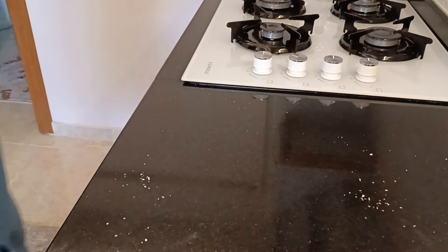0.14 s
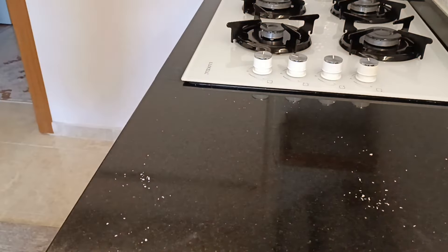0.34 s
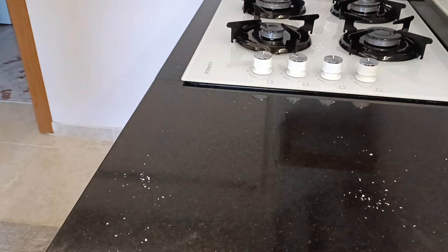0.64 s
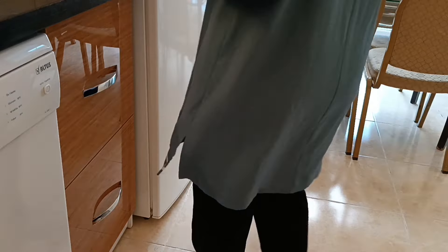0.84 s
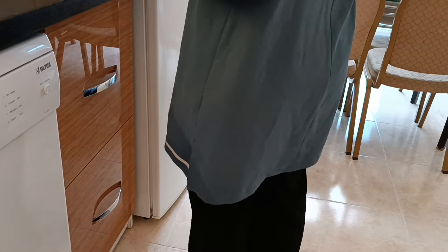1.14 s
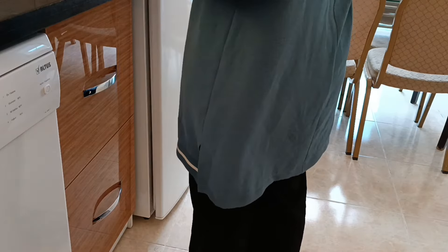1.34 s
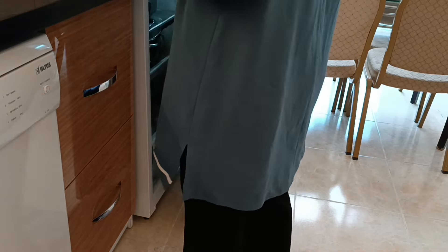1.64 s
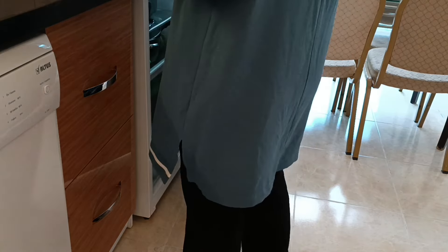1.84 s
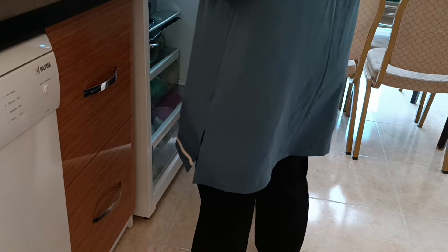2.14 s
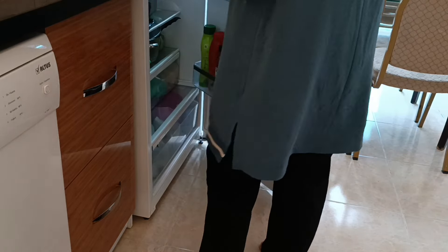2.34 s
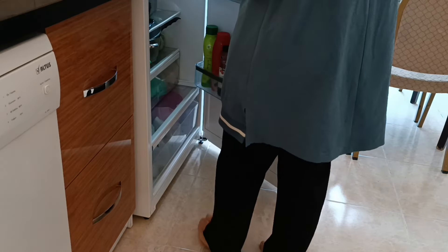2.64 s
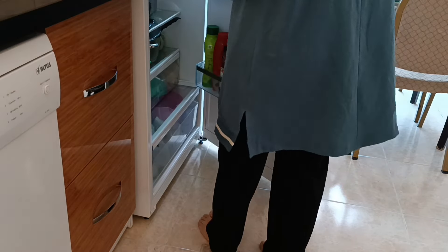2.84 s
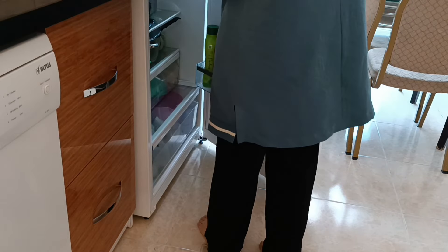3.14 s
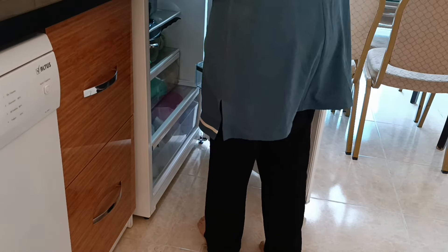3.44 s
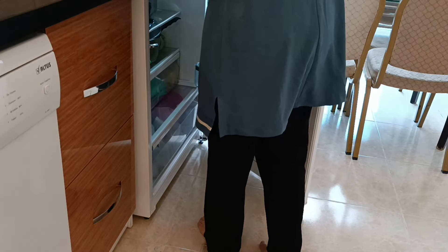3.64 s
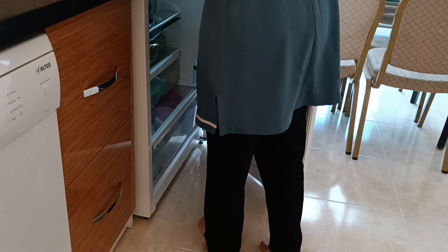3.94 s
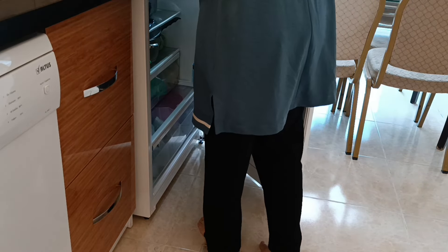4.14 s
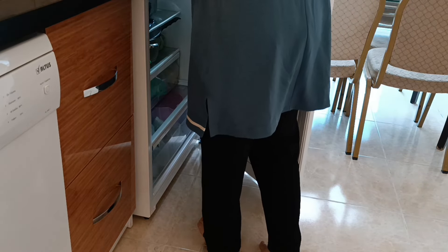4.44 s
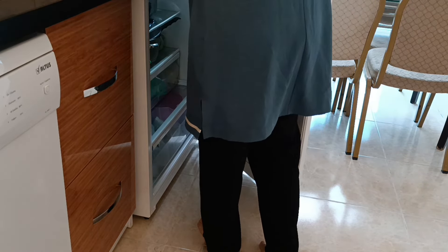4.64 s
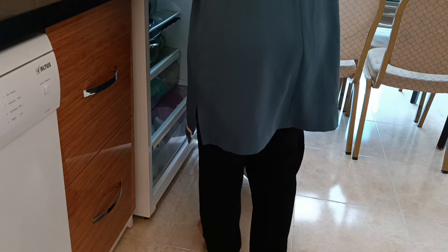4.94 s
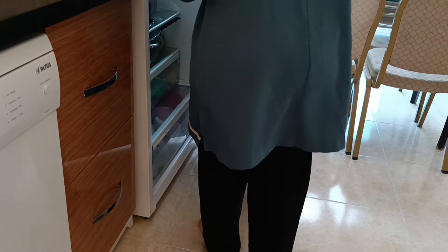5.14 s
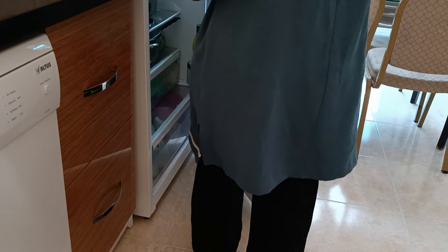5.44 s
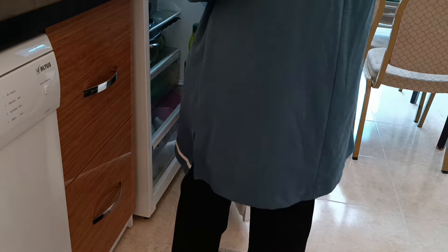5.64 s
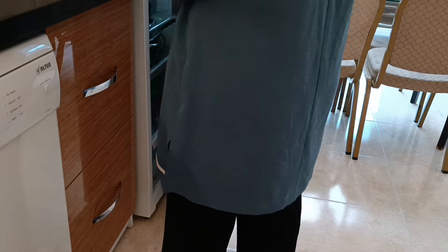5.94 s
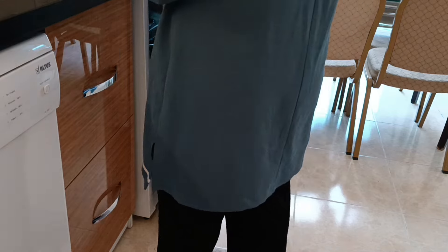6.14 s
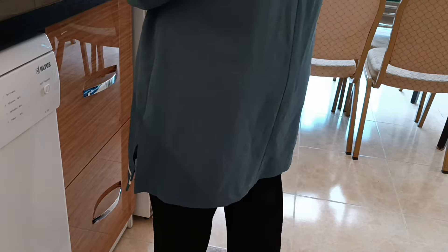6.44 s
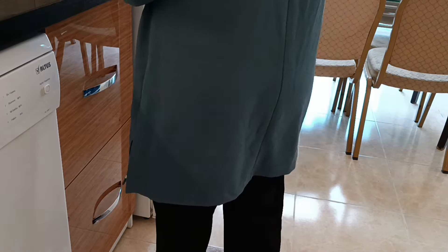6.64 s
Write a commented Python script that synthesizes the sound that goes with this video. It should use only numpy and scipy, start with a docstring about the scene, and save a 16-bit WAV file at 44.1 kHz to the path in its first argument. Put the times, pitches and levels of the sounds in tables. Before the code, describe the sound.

In a tiled kitchen, cloth rustles, a fridge opens, a heavy dish bangs and judders along a shelf, bumps home, and the door closes.

```python
"""A tiled kitchen, two metres from a refrigerator: clothes rustle over still air and the opening has a faint hum.
The gasket crackles as it peels off, and plastic bottles knock hollowly in the door rack.
A heavy glass dish is set on a shelf, scrapes in with a judder and bumps home; then the door swings shut.
Bursts of tiny rebounds drive resonances for the knocks, random slips make the scrape, shaped noise makes
the cloth, and low sines make booms and hums; a dense stereo echo places the nearer sounds in the room."""
import sys
import numpy as np
from scipy import signal
from scipy.fft import rfft, irfft
from scipy.io import wavfile
from scipy.ndimage import uniform_filter1d

SR = 44100
rng = np.random.default_rng(int(sys.argv[2]) if len(sys.argv) > 2 else 0)


def bounce(signal):
    """Save signal as a 16-bit WAV file at the path given by the first command-line argument."""
    frames = np.transpose(np.atleast_2d(signal))
    limited = np.clip(frames, -1, 1)
    pcm = np.round(limited * 32767).astype(np.int16)
    wavfile.write(sys.argv[1], SR, pcm)


N = 298998
TIME = np.arange(N) / SR   # seconds
FILTER_HZ = np.linspace(0, SR / 2, 4097)   # pitches at which filter gains are given

# Spectrum of the still room air, relative: pitch_hz, level_db (per Hz)
AIR_SPECTRUM = [(15, -49), (25, -15), (77, -2), (110, -4), (215, -5), (378, -13), (582, -14.5), (945, -17),
                (1300, -19.5), (1410, -18.5), (2230, -20.5), (6210, -34.5), (8580, -40.5), (15500, -38)]
AIR_LEVEL_DB = -59
# Faint hums, level before wavering: start_s, end_s, pitch_hz, level_db, fade_out_s
HUMS = [(0, .867, 118, -58.5, .08), (0, 0.98, 176, -65.5, .08), (.87, 1.78, 352.6, -59, .45)]

# Echo of the kitchen: pitch_hz, t60_s, echo_over_direct_db, left_right_likeness (0 to 1)
ROOM = [(60, 0.36, 4, 0.71), (138.3, 0.61, -7, 0.78), (277, 0.52, 7, 0.9), (595, 0.46, 18, .5),
        (1313, .53, 10, 0.057), (2900, 0.38, 10.5, 0.012), (6100, 0.35, 10, 0.018), (13800, 0.23, 15.5, 0)]
# Balance of the two channels: pitch_hz, left_over_right_db
STEREO_BALANCE = [(100, 0.5), (400, -2.5), (2400, -1), (7000, -4.5), (10000, 0.5), (13000, 11)]

# Colour of the rustling cloth, relative: pitch_hz, level_db
CLOTH_COLOUR = [(100, -18), (300, -5.5), (900, 0.5), (2000, 4), (3500, -7), (7000, -21), (14000, -34.5)]
# Broad swishes of cloth: middle_s, level_db, half_length_s, brightness_db_per_octave
CLOTH_SWISHES = [(.01, -53.5, 0.015, 1.5), (0.179, -56, 0.094, 5.5), (0.549, -46, 0.076, 0),
                 (0.935, -46, 0.021, 1.5), (0.986, -51, .04, -9), (5.304, -65.5, 0.23, 8),
                 (5.78, -63.5, 0.032, 5.5)]
# Narrow squeaks of rubbed cloth and rubber: middle_s, level_db, half_length_s, pitch_hz
SQUEAKS = [(.28, -56, .2, 3077), (0.415, -57, .14, 1810), (1.335, -38, .018, 2150)]
SQUEAK_OCTAVES = 0.34   # width of a squeak's band

# Jolts of the cabinet (door opens, dish bumps home, door shuts): start_s, boom_db, drone_db, drone_hz
CABINET_JOLTS = [(1.473, -23, -48, 103), (4.635, -26, -26.5, 145.8), (6.404, -30.5, -39.5, 143.4)]
BOOM_HZ, BOOM_T60_S, BOOM_LENGTH_S = 86, 0.17, 0.11
DRONE_DELAY_S, DRONE_T60_S, DRONE_LENGTH_S = 0.1, 0.69, 0.26

HARDNESS_PIVOT_HZ = 684   # hardness and cloth brightness tilt a spectrum about this pitch

# Bottles knocking, level before RACK_GAIN_DB: start_s, level_db, hardness_db_per_octave, chatter_s
RACK_CONTACTS = [(2.394, -32.5, -1.5, 0.015), (2.443, -34.5, -3, 0.0051), (2.596, -41.5, -4, 0.029),
                 (2.708, -47, 2.5, 0.016), (3.008, -44.5, 4, 0.011), (5.850, -53, -5, .022),
                 (6.041, -43, 6, 0.033), (6.060, -40.5, -2.5, 0.016), (6.098, -49, -8.5, 0.0081)]
# Strength of thump, knock, clack, tick and snap in a bottle knock: level_db
RACK_ZONES_DB = [-8, 0, -4.5, -90, -43]
# Borders of those five zones, lowest to highest: edge_hz
RACK_EDGES_HZ = [110, 270, 640, 2700, 5000, 14000]
# Resonances of bottles and rack: pitch_hz, level_db (over the broad response), t60_s
RACK_MODES = [(301, -8, 0.066), (437, 5.5, 0.091), (515, -8, 0.25), (1280, -9, 0.037)]
RACK_GAIN_DB = 24.0

# Door knocking, level before DOOR_GAIN_DB: start_s, level_db, hardness_db_per_octave, chatter_s
DOOR_CONTACTS = [(1.092, -62, -7.5, 0.0044), (1.187, -44, -2.5, 0.094), (1.272, -34.5, -1.2, 0.0022),
                 (1.338, -31.5, 1.3, 0.027), (1.360, -33, 1, 0.048), (1.447, -34, 2, 0.021),
                 (1.480, -41, -4, 0.0174), (6.287, -37, 6.5, 0.0088), (6.325, -41.5, 6, .025),
                 (6.368, -38, 0.5, 0.017), (6.406, -38.5, 5.5, 0.0055), (6.446, -36, 1, 0.0074),
                 (6.548, -38.5, -2, 0.047), (6.748, -52, 0.5, 0.025)]
# Strength of thump, knock, clack, tick and snap in a door knock: level_db
DOOR_ZONES_DB = [0.5, -1, -6, -23.5, -47]
# Borders of those five zones, lowest to highest: edge_hz
DOOR_EDGES_HZ = [105, 200, 640, 2650, 5800, 14000]
# Resonances of the door: pitch_hz, level_db (over the broad response), t60_s
DOOR_MODES = [(174, -9, 0.81), (256.6, 6, 0.11), (343.4, 10, 0.41), (1400, -25, 0.15), (2218, 0, 0.23)]
# Rubber gasket lets go or sticks on, level before GASKET_GAIN_DB: start_s, level_db, crackle_s
GASKET_CRACKLES = [(1.26, -53, 0.082), (1.333, -41, 0.056), (1.445, -41.5, 0.042), (6.362, -48.5, 0.0074),
                   (6.406, -37, 0.00057)]
# Colour of the gasket crackle, relative: pitch_hz, level_db
CRACKLE_COLOUR = [(1500, -2), (3500, 2), (5000, 2.5), (7000, 2.5), (10000, -3), (15000, -9)]
DOOR_GAIN_DB, GASKET_GAIN_DB = 28.5, 26.5

# Dish knocking on the shelf, level before DISH_GAIN_DB: start_s, level_db, hardness_db_per_octave, chatter_s
DISH_CONTACTS = [(3.606, -33, 8.5, 0.0074), (3.611, -15.5, 3.5, 0.011), (3.644, -20.5, -.5, 0.0042),
                 (3.736, -25, 0, 0.005), (3.783, -27, -1.5, 0.011), (3.872, -29.5, 0, 0.023),
                 (3.904, -18.5, 1, 0.047), (4.094, -28, 4, 0.0033), (4.113, -21, 1.5, .012),
                 (4.355, -58, -11.5, 0.016), (4.42, -49, -6.5, 0.06), (4.497, -39, -2.5, 0.027),
                 (4.605, -22.5, -0.1, 0.04), (4.652, -13.5, -3.16, 0.0043), (4.701, -30.5, -5.5, 0.0088),
                 (4.749, -33, 4.3, 0.0095)]
# Strength of thump, knock, clack, tick and snap in a dish knock: level_db
DISH_ZONES_DB = [-14.5, -4.5, 2, -20, -41]
# Borders of those five zones, lowest to highest: edge_hz
DISH_EDGES_HZ = [105, 185, 500, 2850, 5500, 14000]
# Heavy bumps of the dish against the cabinet, level before DISH_GAIN_DB: start_s, level_db
DISH_BUMPS = [(3.383, -20), (3.624, -26), (4.635, -12.5)]
# Strength of thump, knock, clack, tick and snap in a heavy bump: level_db
BUMP_ZONES_DB = [1, -8.5, -20, -41.5, -38.5]
BUMP_CHATTER_S, REBOUND_S, REBOUND_LOSS_DB = 0.0033, 0.039, 11.5
# Resonances of the shelf: pitch_hz, level_db (over the broad response), t60_s
SHELF_MODES = [(141, -1.5, 0.72), (186.2, -7, 0.13), (233.4, 6, 0.11), (267.5, 5.5, 0.22), (352.5, 6, 0.25),
               (412.8, 0.5, 0.27), (673, 3, 0.22), (920, -4, 0.25), (1100, 4.5, 0.076), (1199, 2.5, .13),
               (1560, -4.5, .22), (1700, 3, 0.053), (1905, 0, 0.044), (2100, 0, 0.037), (2515, 0.5, 0.17),
               (3363, -7, 0.035)]
DISH_GAIN_DB = 27.0
# Shoves of the dish along the shelf, level before the shelf rings: start_s, friction_db, hold_s
SHOVES = [(3.783, -35.5, 0.093), (3.844, -25.5, 0.11), (4.062, -25.5, 0.048)]
SHOVE_ATTACK_S, SHOVE_EASE_DB_PER_S, DISH_RESTS_AT_S = 0.049, 103, 4.39
# Colour of the scrape before the shelf rings, relative: pitch_hz, level_db
SCRAPE_COLOUR = [(60, -24), (150, -0.5), (250, -1), (430, 7), (600, 0), (1100, -5), (2100, -5),
                 (3400, -15.5), (6000, -28.5), (10000, -45.5), (15000, -55)]
SLIPS_PER_S = 260   # average

PEAK_LIMIT, CUTOFF_HZ = 0.8, 15900   # microphone: full scale is 1


def amp(db):
    """Decibels to gain."""
    return 10 ** (np.asarray(db) / 20)


def unit(x):
    """Scale to an energy of one."""
    return x / np.sqrt(np.sum(x ** 2) + 1e-20)


def add(track, s, sound):
    """Mix a sound in at a time."""
    start = max(0, round(s * SR))
    track[start:start + len(sound)] += sound[:N - start]


def at_hz(rows, hz):
    """Read every column of a table on a log-frequency axis."""
    known, *columns = np.transpose(rows)
    log_hz = np.log(np.maximum(hz, 1))
    return [np.interp(log_hz, np.log(known), column) for column in columns]


def causal(x, gain):
    """Minimum-phase filter with the given gain at FILTER_HZ: nothing sounds before its cause."""
    cepstrum = irfft(np.log(gain + 1e-7))
    half = len(gain) - 1
    # Fold the cepstrum forward in time
    cepstrum[1:half] *= 2
    cepstrum[half + 1:] = 0
    impulse = irfft(np.exp(rfft(cepstrum)))
    return signal.fftconvolve(x, impulse)[:len(x)]


def coloured(x, spectrum):
    """Give a sound a spectrum; white noise keeps its power."""
    gain = unit(amp(at_hz(spectrum, FILTER_HZ)[0]))
    return causal(x, np.sqrt(len(FILTER_HZ)) * gain)


def band_power(low, high):
    """Power spectrum of a band with sloping skirts; mean one."""
    hz = FILTER_HZ + 1
    distance = (hz * hz - low * high) / (hz * (high - low))
    power = 1 / (1 + distance ** 6)
    return power / power.mean()


def evened(x):
    """Keep the timing of a sound but spread its energy evenly over pitch."""
    size = x.shape[-1]
    phase = np.angle(rfft(x, 2 * size))
    return irfft(np.exp(1j * phase))[..., :size]


def two_ears(size, spectrum):
    """Stereo noise that is alike in the bass and unrelated in the treble, as in any diffuse field."""
    hz = np.arange(size // 2 + 1) * SR / size
    alike = np.clip(at_hz(ROOM, hz)[2], -1, 1)
    mid, side = np.exp(2j * np.pi * rng.random((2, len(hz))))
    both = np.sqrt(1 + alike) * mid + np.sqrt(1 - alike) * side * [[1], [-1]]
    noise = irfft(both * amp(at_hz(spectrum, hz)[0]), size)
    return np.sqrt(2 * size) * unit(noise)


def background(rise_s=0.017, waver_db=5.0):
    """Still room air as diffuse noise, and faint sine hums of wavering level that come and go."""
    out = amp(AIR_LEVEL_DB) * two_ears(N, AIR_SPECTRUM)
    for start, end, hz, level_db, fade_s in HUMS:
        # Half open at the start and end times
        gate = np.clip(np.minimum((TIME - start) / rise_s, (end - TIME) / fade_s) + 0.5, 0, 1)
        # A new random level 20 times a second, joined by straight lines
        waver = np.interp(TIME * 20, np.arange(140), rng.standard_normal(140))
        tone = np.sqrt(2) * np.sin(2 * np.pi * hz * TIME)
        out = out + amp(level_db + waver_db * waver) * gate * tone
    return out


def diffuse_noise(count=4, mixing_s=0.098):
    """Early reflections that favour no single pitch, then the plain noise of the late echo."""
    noise = late = two_ears(SR, [(1, 0)])
    fade = amp(-60 * TIME[:SR] / at_hz(ROOM, 1500)[0])
    # Even out pitch and loudness in turn
    for _ in range(count):
        echo = evened(noise * fade)
        noise = echo / np.sqrt(np.abs(uniform_filter1d(echo ** 2, size=1500)) + 1e-18)
    early = np.exp(-(TIME[:SR] / mixing_s) ** 2)
    return early * noise + (1 - early) * late


def kitchen(x, build_s=0.00066, lag_s=0.0001):
    """Direct sound, a little later on the right, plus a dense echo off the tiles that dies soonest at the top."""
    t, hz = TIME[:SR], np.arange(SR // 2 + 1)
    noise = rfft(diffuse_noise())
    direct = np.exp(-2j * np.pi * hz * lag_s * np.array([[0], [1]]))
    edges = np.r_[0, np.geomspace(100, 16000, 16), SR]
    echo = 0
    for low, high in zip(edges, edges[1:]):
        inside = (hz >= low) & (hz < high)
        t60, echo_db, _ = at_hz(ROOM, (low + high) / 2)
        tail = irfft(noise * inside) * amp(-60 * t / t60) * (1 - np.exp(-t / build_s))
        echo = echo + amp(echo_db) * np.sqrt(2 * inside.mean()) * unit(tail)
    # Scale down by the combined power of direct sound and echo
    total = (rfft(echo) + direct) / np.sqrt(1 + amp(at_hz(ROOM, hz)[1]) ** 2)
    balance = amp(at_hz(STEREO_BALANCE, hz)[0] * np.array([[0.5], [-0.5]]))
    response = irfft(total * balance)
    return signal.fftconvolve(x[None], response[:, :-SR // 10], axes=1)[:, :N]


def brushes():
    """Soft swells of rubbing noise: broad where cloth swishes, narrow where a surface squeaks."""
    octaves = np.log2((FILTER_HZ + 1) / HARDNESS_PIVOT_HZ)
    cloth_db = at_hz(CLOTH_COLOUR, FILTER_HZ)[0]
    half = 2 ** (SQUEAK_OCTAVES / 2)
    rubs = []
    for s, level_db, length_s, tilt in CLOTH_SWISHES:
        rubs.append((s, level_db, length_s, amp(cloth_db + tilt * np.maximum(octaves, -2))))
    for s, level_db, length_s, hz in SQUEAKS:
        rubs.append((s, level_db, length_s, np.sqrt(band_power(hz / half, hz * half))))
    out = np.zeros(N)
    for s, level_db, length_s, colour in rubs:
        size = int(2 * length_s * SR)
        noise = rng.standard_normal(SR)[:size]
        rub = causal(noise, np.sqrt(len(colour)) * unit(colour))
        add(out, s - length_s, amp(level_db) * rub * np.hanning(len(rub)))
    return out


def low_tone(hz, t60, length_s, swell_s=0.0167, cut_s=0.012):
    """A low, slowly fading tone with a soft start, cut short after a set length."""
    t = TIME[:SR // 2]
    gate = np.clip(t / swell_s, 0, 1) * np.clip((length_s - t) / cut_s + 1, 0, 1)
    return np.sqrt(2) * gate * amp(-60 * t / t60) * np.sin(2 * np.pi * hz * t)


def booms():
    """Each jolt gives a short deep boom, then a panel drones on a little higher."""
    out = np.zeros(N)
    for s, boom_db, drone_db, drone_hz in CABINET_JOLTS:
        add(out, s, amp(boom_db) * low_tone(BOOM_HZ, BOOM_T60_S, BOOM_LENGTH_S))
        add(out, s + DRONE_DELAY_S, amp(drone_db) * low_tone(drone_hz, DRONE_T60_S, DRONE_LENGTH_S))
    return out


def chatter(length_s, first=0.85, per_s=2500):
    """Force of one contact: a first touch, weaker in long contacts, then tiny rebounds that die away."""
    t = TIME[:SR // 4]
    fade = np.exp(-t / max(length_s, 1e-3))
    rebounds = rng.standard_normal(len(t)) * (rng.random(len(t)) < per_s / SR)
    force = unit(rebounds * fade)
    force[0] += first * np.exp(-length_s / 0.0071)
    return unit(evened(force) * fade ** 0.25)


def contacts(rows, edges_hz, zones_db):
    """Each contact drives the object from deep thump to surface snap; the harder it is, the brighter."""
    out = np.zeros(N)
    zones = list(zip(edges_hz, edges_hz[1:]))
    bands = [band_power(low, high) for low, high in zones]
    centres_hz = np.sqrt(np.prod(zones, axis=1))
    octaves = np.log2(centres_hz / HARDNESS_PIVOT_HZ)
    for s, level_db, hardness, length_s in rows:
        levels = amp(level_db + np.array(zones_db) + hardness * octaves)
        gain = np.sqrt(levels ** 2 @ bands)
        add(out, s, causal(chatter(length_s), gain))
    return out


def body(force, modes):
    """A broad response with the object's resonances standing out of it."""
    out = force.copy()
    for hz, level_db, t60 in modes:
        r = amp(-60 / (t60 * SR))   # decay per sample
        zeros = np.array([1, 0, -1]) * (1 - r * r) / 2
        poles = [1, -2 * r * np.cos(2 * np.pi * hz / SR), r * r]
        out += amp(level_db) * signal.lfilter(zeros, poles, force + 1e-18)
    return out


def bottles():
    """Plastic bottles jostle hollowly in the rack as the door swings: knocks ring its low resonances."""
    knocks = contacts(RACK_CONTACTS, RACK_EDGES_HZ, RACK_ZONES_DB)
    return amp(RACK_GAIN_DB) * body(knocks, RACK_MODES)


def door():
    """The door knocks against its frame and rings; the gasket crackles in bursts of tiny releases."""
    crackle = np.zeros(N)
    for s, level_db, length_s in GASKET_CRACKLES:
        add(crackle, s, amp(level_db) * chatter(length_s, per_s=2100))
    knocks = contacts(DOOR_CONTACTS, DOOR_EDGES_HZ, DOOR_ZONES_DB)
    gasket = amp(GASKET_GAIN_DB) * coloured(crackle, CRACKLE_COLOUR)
    return amp(DOOR_GAIN_DB) * body(knocks, DOOR_MODES) + gasket


def bumps():
    """The weight of the dish meets the cabinet and rebounds once, more weakly."""
    first = [(s, db, 0, BUMP_CHATTER_S) for s, db in DISH_BUMPS]
    again = [(s + REBOUND_S, db - REBOUND_LOSS_DB, 0, BUMP_CHATTER_S) for s, db in DISH_BUMPS]
    return contacts(first + again, DISH_EDGES_HZ, BUMP_ZONES_DB)


def shoves():
    """Friction under the dish: each shove builds up, holds and eases off, until the dish comes to rest."""
    push = np.zeros(N)
    for s, level_db, hold_s in SHOVES:
        t = TIME - s
        easing_db = SHOVE_EASE_DB_PER_S * np.maximum(t - SHOVE_ATTACK_S - hold_s, 0)
        shove = np.clip(t / SHOVE_ATTACK_S, 0, 1) * amp(level_db - easing_db)
        push = np.maximum(push, shove)
    return push * np.clip((DISH_RESTS_AT_S - TIME) / SHOVE_ATTACK_S, 0, 1)


def dish(size_spread_db=5.5, grit_db=-3):
    """Knocks and the uneven stick-slip of the sliding glass ring the same shelf."""
    slip_times = rng.random(N) < SLIPS_PER_S / SR
    slip_sizes = amp(size_spread_db * rng.standard_normal(N))
    slips = slip_times * slip_sizes * rng.choice([-1, 1], N)
    grit = amp(grit_db) * unit(rng.standard_normal(N))
    friction = np.sqrt(N) * unit(unit(slips) + grit)
    scrape = coloured(friction * shoves(), SCRAPE_COLOUR)
    knocks = contacts(DISH_CONTACTS, DISH_EDGES_HZ, DISH_ZONES_DB) + bumps()
    return body(scrape + amp(DISH_GAIN_DB) * knocks, SHELF_MODES)


def scene():
    """Door and shelf each have their own echo paths; low booms and hums fill the kitchen evenly."""
    door_side = kitchen(door() + brushes())
    shelf_side = kitchen(dish() + bottles())
    return door_side + shelf_side + booms() + background()


def record(dry):
    """The microphone loses the deep bass, the highest peaks are rounded and the top is cut."""
    thin = signal.sosfilt(signal.butter(2, 30, "high", fs=SR, output="sos"), dry)
    rounded = thin / (1 + (thin / PEAK_LIMIT) ** 4) ** 0.25
    return signal.sosfilt(signal.ellip(10, 0.1, 90, CUTOFF_HZ, fs=SR, output="sos"), rounded)


dry = scene()
out = record(dry)
bounce(out)
```